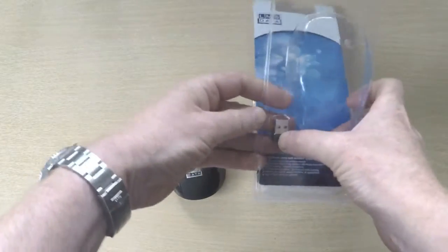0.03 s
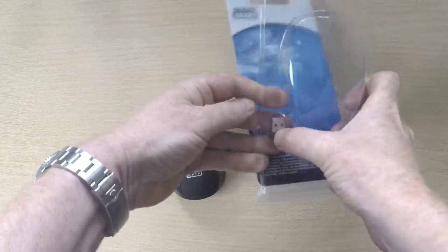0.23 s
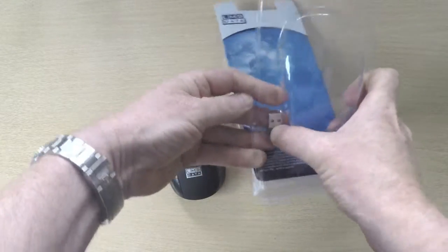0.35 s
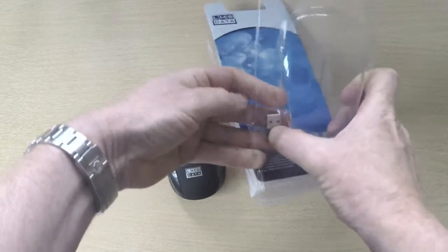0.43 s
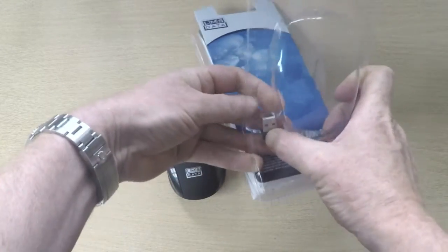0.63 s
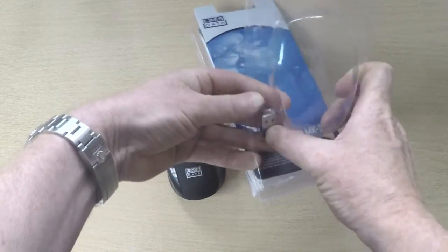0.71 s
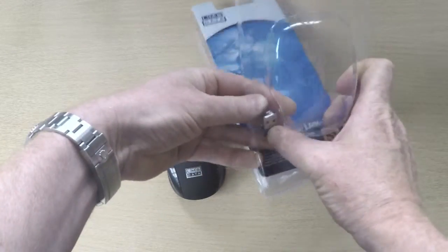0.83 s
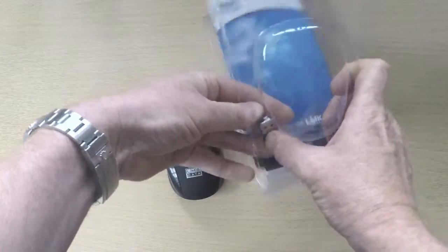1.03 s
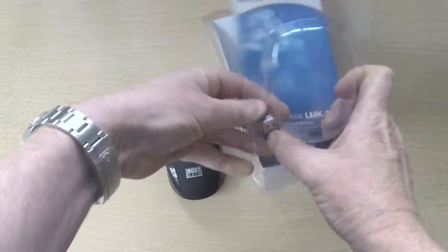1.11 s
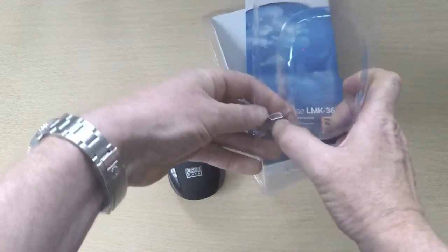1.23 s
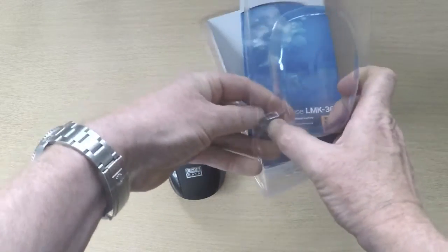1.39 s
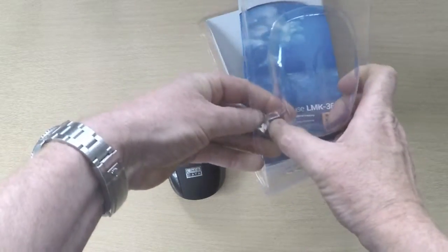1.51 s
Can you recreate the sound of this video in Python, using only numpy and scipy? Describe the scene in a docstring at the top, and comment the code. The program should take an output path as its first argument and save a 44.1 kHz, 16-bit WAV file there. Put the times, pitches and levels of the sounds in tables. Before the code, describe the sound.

Plastic packaging snaps and clicks irregularly as it is pulled apart by hand. Its edges rasp briefly between the snaps, with faint finger rubbing and one soft knock underneath, close to the microphone in a small room.

```python
"""A clear plastic blister pack is prised open by hand, just above a desk in a small room.
The thin shell buckles in single snaps, and its edges rasp over each other as the tray comes free.
Each snap and rasp rings the shell, bounces off the desk and dies in the room.
A soft knock thuds once, and fingers rub faintly on the plastic over a low room tone."""
import sys
import numpy as np
from scipy import signal
from scipy.fft import rfft, irfft, next_fast_len
from scipy.io import wavfile

SR = 44100
rng = np.random.default_rng(int(sys.argv[2]) if len(sys.argv) > 2 else 0)


def master(y):
    """Save y as 16-bit WAV."""
    cut = np.clip(np.atleast_2d(y).T, -1, 1)
    pcm = np.round(cut * 32767)  # scale
    wavfile.write(sys.argv[1], SR, pcm.astype(np.int16))


N = 68355
TIME = np.arange(N) / SR

# One buckle a row: t/s, bass/dB, body/dB, hollow/dB, middle/dB, crack/dB, air/dB, crack edge/Hz,
# low panel note/Hz, high panel note/Hz, note level/dB, room send/dB
SNAPS = [(0.112, -52, -40, -38, -38, -37.5, -49, 4500, 950, 1700, 3, 4),
         (.173, -35, -16, -22.5, -32.5, -35.5, -51, 4500, 890, 1020, 9.5, -3),
         (0.2404, -14.5, 14.5, 10.5, -2, -15.5, -44, 3720, 670, 1382, 4.5, -9),
         (.2440, -4, -18, 0.5, -5, -15, -32, 4520, 910, 2550, 2, -3.5),
         (0.2765, 0, 9.5, -2, -2, -10, -32.5, 6480, 1500, 2544, 9, -3.5),
         (0.5125, -6, 7.5, -0.5, 0, -3.5, -38, 4370, 956, 2240, 2.5, -7),
         (0.7095, -24, 4, -12, -21.5, -26, -42, 4300, 1500, 3440, 8.5, -3),
         (.7367, -18, -23, -8.5, -16.5, -48, -72, 2580, 877, 1460, 14.5, -8),
         (0.7655, -23, 7.5, 2.5, -5, -4, -44, 4300, 671.4, 2008, 11, -2.5),
         (.7945, -28, -10, -12, -16, -27, -57, 4300, 674, 2050, 1, -6),
         (1.0355, -24, -13, -9, -19, -17.5, -36, 5100, 970, 1700, 11, 3),
         (1.2253, -5, 9, 4.5, -3, 0, -36, 4520, 766, 1514, 7, -5.5),
         (1.3221, -36, -51, -18.5, -15.5, -23, -37.5, 4700, 987, 2300, 1, -4),
         (1.5227, -34, -29, -14, -17.5, -13, -44, 4500, 1058, 2830, 7.5, -5)]


def snaps(gain_db=-3):
    """Each buckle is a single click that sounds the notes of the panel that gives."""
    out = np.zeros(N)
    for start, *eq, low_hz, high_hz, notes_db, room_db in SNAPS:
        snap = contact(np.ones(1), low_hz, high_hz, notes_db, room_db)
        add(out, start, contact_eq(snap, *eq))
    return from_db(gain_db) * out


# One scrape of the edges a row: t/s, length/s, body/dB, hollow/dB, middle/dB, crack/dB, air/dB,
# low edge note/Hz, high edge note/Hz, note level/dB
RASPS = [(0.01, 0.019, -18, -12, -19.5, -22, -34, 1022, 2890, 3.5),
         (.318, .005, -0.5, -1, -10, -20.5, -32.5, 1567, 2520, 4),
         (0.33, 0.0062, -7, -11, -12.5, -21.5, -34, 1540, 2490, 7),
         (.467, 0.017, -4.5, -14, -26.5, -26.5, -37, 201, 1560, 5),
         (.974, 0.0086, -9.5, -11.5, -21, -28.5, -40.5, 852, 1730, 5.2),
         (1.053, 0.0067, -7.5, -7.5, -3.5, -4, -19.5, 895, 1920, 4.6),
         (1.0702, 0.005, -7, -11, -1, -3, -18, 916, 2160, 4),
         (1.0959, .004, 1.5, -4.5, 0.5, -1.5, -14, 989, 2650, 8.1),
         (1.1888, .006, -2, -8.5, -12.5, -16, -32, 886, 1060, 2.2),
         (1.383, 0.017, -19, -24, -21.5, -28.5, -54, 935, 1430, 4)]


def rasps(gain_db=-3, slips_per_s=1600, spread_db=1.5, bass_loss_db=8):
    """Edges stick and slip: each rasp is a quick, uneven run of clicks."""
    out, t = np.zeros(N), TIME[:1200]
    for start, length, body, *upper_eq, low_hz, high_hz, notes_db in RASPS:
        chance, size = rng.random(len(t)), rng.standard_normal(len(t))
        slipping = ((chance < slips_per_s / SR) & (t < length)) | (t == 0)
        slips = unit_energy(slipping * np.sign(size) * from_db(spread_db * np.abs(size)))
        rasp = contact(slips, low_hz, high_hz, notes_db, room_db=-2.5)
        add(out, start, contact_eq(rasp, body - bass_loss_db, body, *upper_eq, edge_hz=5500))
    return from_db(gain_db) * out


DESK_DELAY_S, DESK_ECHO = 0.00295, 0.28
# Ring of the whole shell: f/Hz, level over a bare click/dB
SHELL_MODES = [(228, -12), (366, 3.5), (497, 0.5), (675, 3.5), (750, -6), (886, -12), (942, 2.5), (1084, 0),
               (1443, 5), (1556, -3), (2012, -9), (2720, 3), (2768, 7.5), (2884, 6), (4720, -2)]


def contact(clicks, low_hz, high_hz, notes_db, room_db):
    """Each click gives a push, a crack, a flutter and ringing notes; the desk and room answer."""
    t = TIME[:int(0.4 * SR)]

    def driven(response):
        return signal.fftconvolve(clicks, response)[:len(t)]

    def burst(t60):
        power = np.convolve(clicks ** 2, dying(t60, t) ** 2)[:len(t)]
        return unit_energy(rng.standard_normal(len(t)) * np.sqrt(power))

    # The panel's one clean jump carries the lows.
    impulse = (t == 0) + 1e-18
    push = from_db(0.5) * butter(impulse, 1700, "low")
    notes = 0
    for hz in (low_hz, high_hz):
        notes += mode(hz, notes_db, t, t60=33 / hz)  # falls quickly, over 33 cycles
        notes += mode(hz, notes_db + 6.5 + room_db, t, t60=0.15)  # then rings on softly
    ring = sum(mode(hz, db + rng.normal(0, 1.1), t, t60=0.23) for hz, db in SHELL_MODES)
    crack = from_db(-2) * butter(burst(t60=0.0096), 1310, "high")  # bending waves smear the highs
    flutter = from_db(-2) * burst(t60=0.067)  # crowded, quickly damped modes of the thin sheet
    direct = driven(push) + crack
    desk = DESK_ECHO * np.interp(t - DESK_DELAY_S, t, direct, left=0)
    build_up = np.interp(t, TIME[:len(clicks)], np.cumsum(clicks ** 2))
    reverb = from_db(room_db) * build_up * room_tail(t)
    return direct + desk + driven(notes + ring) + flutter + reverb


def contact_eq(x, bass, body, hollow, middle, crack, air, edge_hz):
    """Six-band colour of one contact, set by where and how sharply the sheet gives."""
    band_hz = (184, 354.5, 808, 1950, edge_hz, 8460)
    return colour(x, list(zip(band_hz, (bass, body, hollow, middle, crack, air))))


# Voice of the whole shell: f/Hz, gain/dB
SHELL_EQ = [(370, 2), (530, -3), (680, 1), (1000, 0), (1280, -3), (1550, -0.5), (2800, 3), (3500, -1.5),
            (4300, 3.5), (5200, 1.5), (8000, 3), (11000, -3.5), (13000, 1.5), (15500, -9)]


def shell_radiation(x, low_cut_hz=49):
    """The light shell colours what it radiates and gives off little deep bass."""
    return butter(colour(x, SHELL_EQ), low_cut_hz, "high")


# Damped modes of the thud: f/Hz, level/dB, t60/s
KNOCK_MODES = [(78, 3, 0.11), (144, 3.5, 0.067), (223.5, -0.5, 0.096), (350, 0, .14)]


def knock(start_s=0.7052, contact_s=0.0036, gain_db=-37.5):
    """A soft push sets the whole pack thudding."""
    out, t = np.zeros(N), TIME[:SR // 4]
    push = np.sin(np.pi * np.minimum(t / contact_s, 1)) ** 2
    thud = sum(from_db(db) * dying(t60, t) * np.sin(2 * np.pi * hz * t) for hz, db, t60 in KNOCK_MODES)
    add(out, start_s, signal.fftconvolve(push / push.sum(), thud))
    return from_db(gain_db) * out


# Swell of the finger rub: t/s, level/dB
RUB_ENVELOPE = [(0, -69.5), (.13, -72), (.2, -66), (.3, -64), (.45, -57.5), (.62, -67.5), (.9, -79),
                (1.0, -66.5), (1.3, -65.5), (1.42, -68.5), (1.48, -67.5), (1.55, -73)]
# Colour of the finger rub: f/Hz, gain/dB
RUB_EQ = [(100, -9), (250, -12.5), (355, 7.5), (550, -10.5), (950, -13), (1400, -24.5), (4500, -20.5),
          (8500, -34), (15000, -48)]


def finger_rub(grains_per_s=2500, spread_db=1):
    """Faint, fine grains as skin slides on the plastic."""
    ticks = (rng.random(N) < grains_per_s / SR) * rng.choice([-1, 1], N)
    grains = ticks * from_db(spread_db * np.minimum(rng.exponential(1, N), 4))
    envelope = from_db(np.interp(TIME, *np.transpose(RUB_ENVELOPE)))
    return np.sqrt(N) * unit_energy(colour(grains, RUB_EQ)) * envelope


# Reverb time of the small room: f/Hz, t60/s
ROOM_DECAY = [(150, 0.2), (500, 0.29), (1400, .3), (3700, 0.26), (12000, 0.2)]


def room_tail(t):
    """Diffuse reflections fade in after the desk bounce and die band by band."""
    edges_hz = np.geomspace(60, 18000, num=7)
    white, tail = rng.standard_normal((2, len(t))), 0
    for k, (low, high) in enumerate(zip(edges_hz, edges_hz[1:])):
        t60 = at_hz(ROOM_DECAY, np.sqrt(low * high))
        tail += butter(white[k % 2], [low, high], "band") * dying(t60, t)
    fade_in = np.clip(t / DESK_DELAY_S - 1, 0, 1)
    return unit_energy(tail * fade_in)


# Colour of the background bed: f/Hz, gain/dB
ROOM_TONE_EQ = [(20, -7), (40, -6), (60, 3), (95, -14), (200, -18), (370, -21), (800, -25.5), (2000, -31.5),
                (5000, -37), (8500, -44), (15000, -49)]


def room_tone(level_db=-59.5):
    """A steady bed of low rumble and faint hiss."""
    noise = colour(rng.standard_normal(N + SR // 4), ROOM_TONE_EQ)[-N:]
    return from_db(level_db) * np.sqrt(N) * unit_energy(noise)


def mode(hz, db, t, t60):
    """A dying cosine whose resonance stands db over a unit click."""
    fade = dying(t60, t)
    return 2 * from_db(db) * fade / fade.sum() * np.cos(2 * np.pi * hz * t)


def colour(x, points):
    """Minimum-phase EQ through points of f/Hz, gain/dB."""
    size = 2 * next_fast_len(len(x) + 2048)
    gain = from_db(at_hz(points, np.fft.rfftfreq(size, 1 / SR)))
    cepstrum = irfft(np.log(gain))
    # Fold onto positive time, so nothing rings ahead of a click.
    cepstrum[1:size // 2] *= 2
    cepstrum[size // 2 + 1:] = 0
    return irfft(rfft(x, size) * np.exp(rfft(cepstrum)))[:len(x)]


def at_hz(points, hz):
    """Read a table on a log-frequency axis."""
    f, value = np.transpose(sorted(points))
    return np.interp(np.log(np.maximum(hz, 1)), np.log(f), value)


def butter(x, hz, kind):
    return signal.sosfilt(signal.butter(2, hz, kind, fs=SR, output="sos"), x)


def from_db(db):
    return 10 ** (np.asarray(db) / 20)


def dying(t60, t):
    return from_db(-60 * t / t60)


def unit_energy(x):
    return x / np.sqrt(np.sum(x ** 2) + 1e-20)


def add(out, start_s, x):
    start = max(int(start_s * SR), 0)
    out[start:start + len(x)] += x[:N - start]


def scene():
    """Mono mix: the crackling pack up front; fingers, knock and room tone behind."""
    pack = shell_radiation(snaps() + rasps())
    return (pack + finger_rub() + knock() + room_tone())[None]


def record(dry):
    """A steep high cut at 15.4 kHz."""
    return signal.sosfilt(signal.ellip(10, 0.1, 70, 15400, fs=SR, output="sos"), dry)


dry = scene()
out = record(dry)
master(out)
```